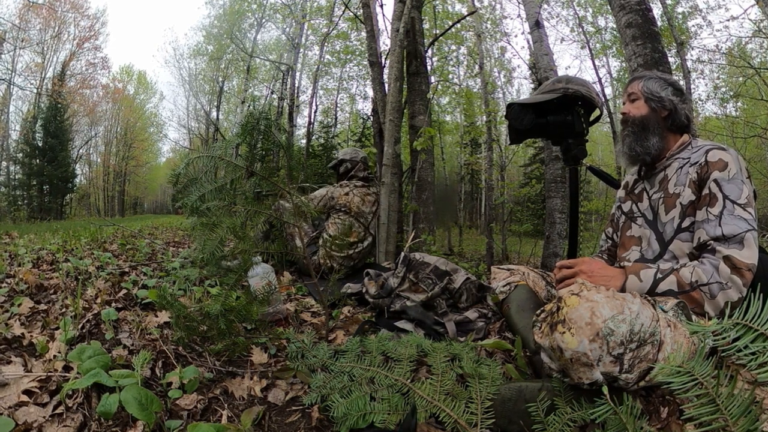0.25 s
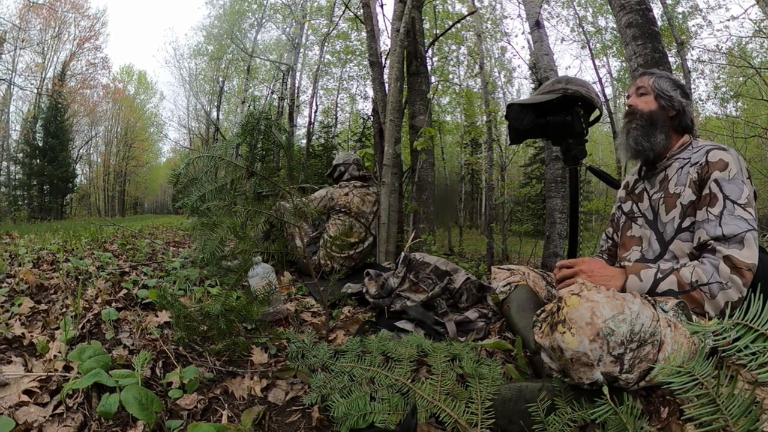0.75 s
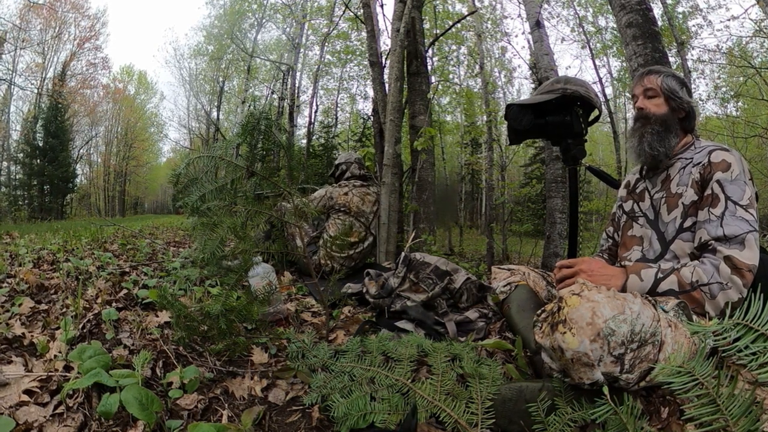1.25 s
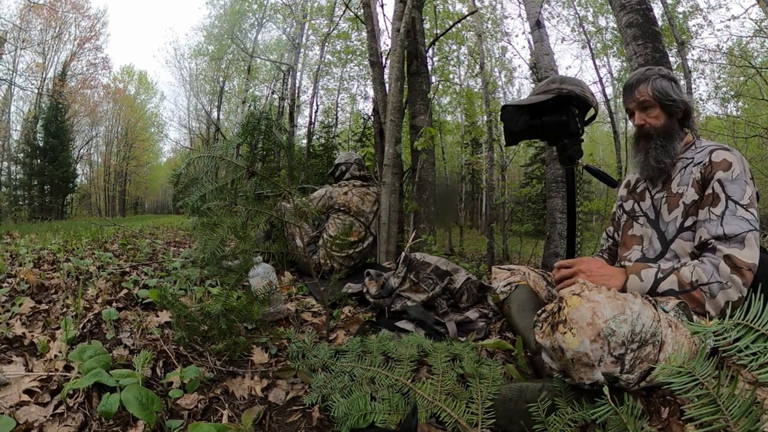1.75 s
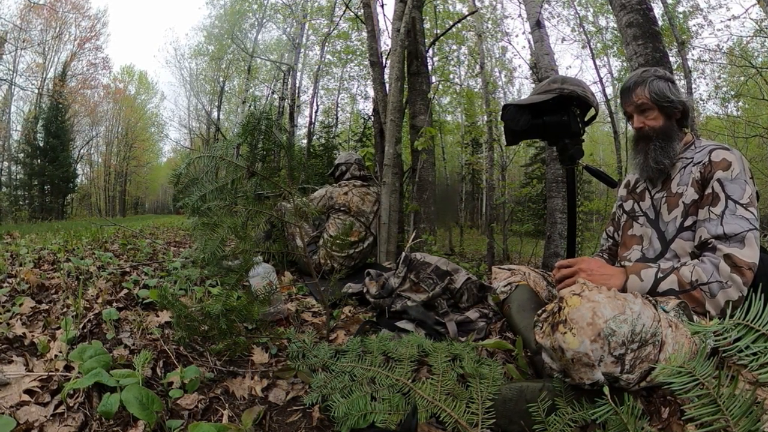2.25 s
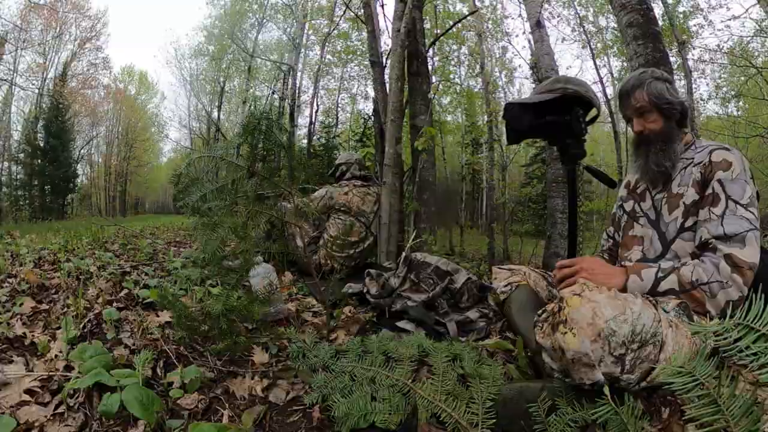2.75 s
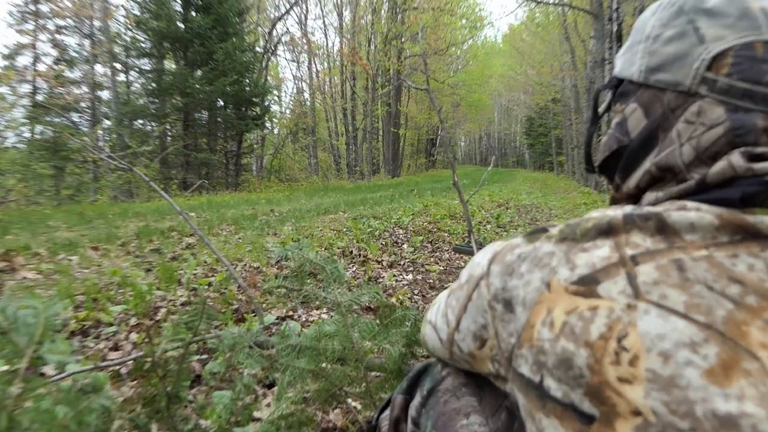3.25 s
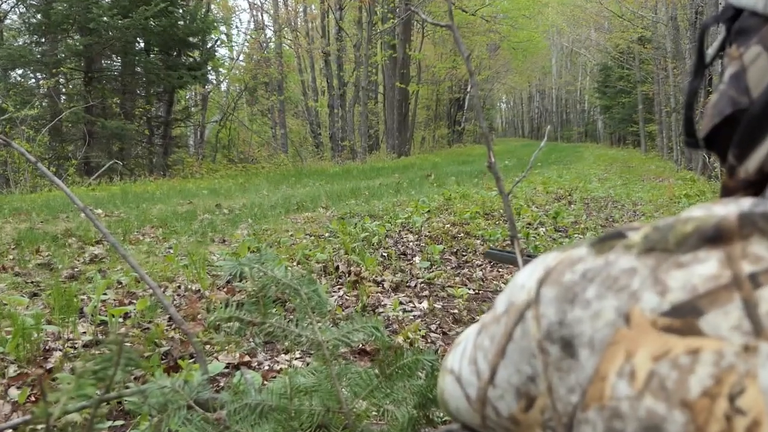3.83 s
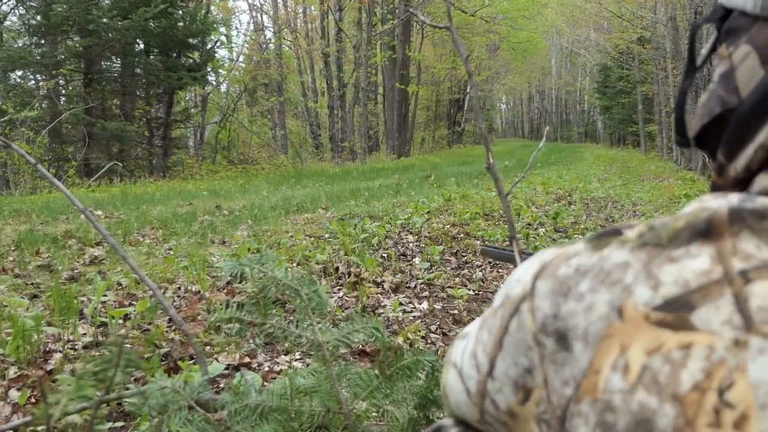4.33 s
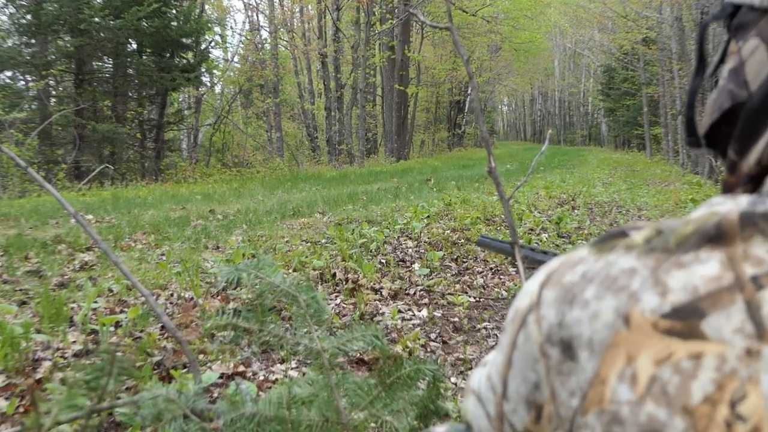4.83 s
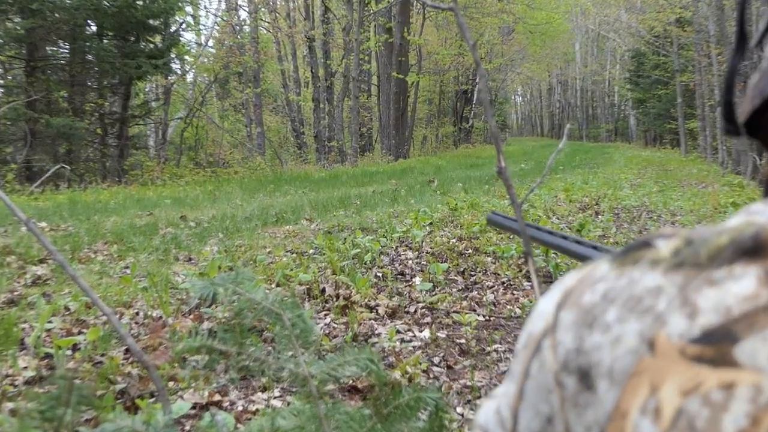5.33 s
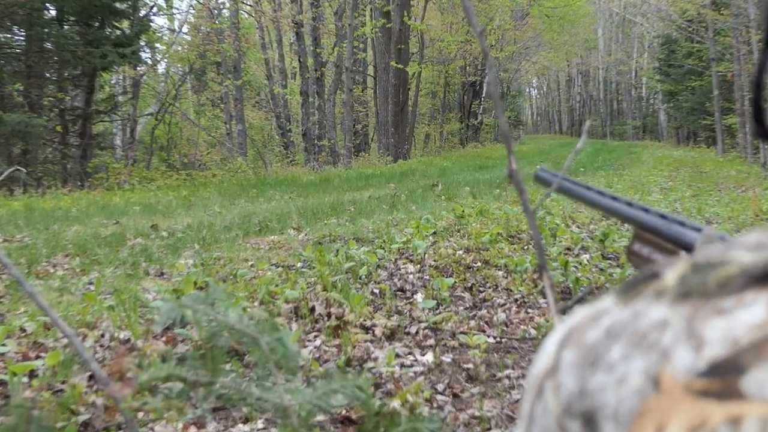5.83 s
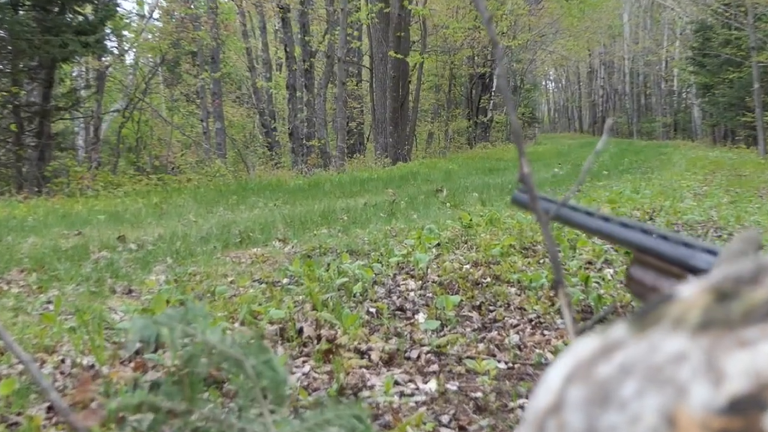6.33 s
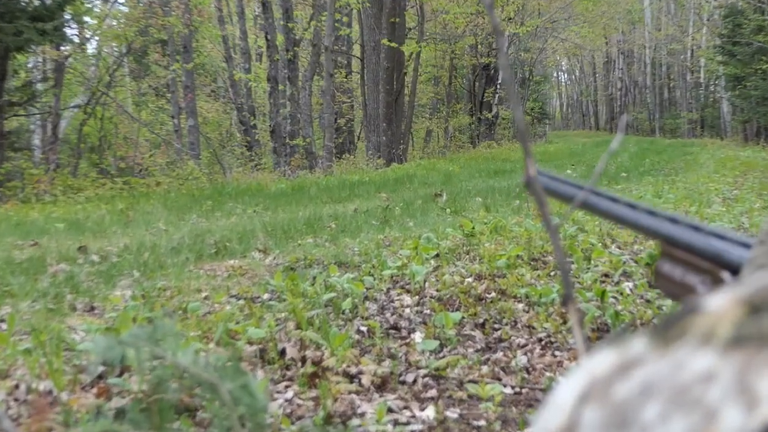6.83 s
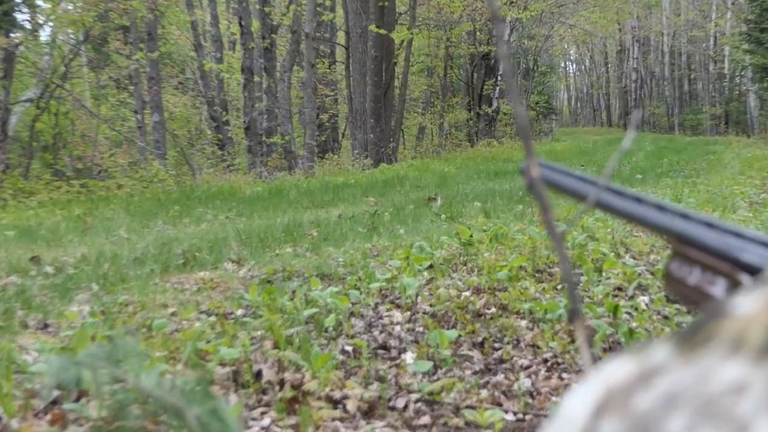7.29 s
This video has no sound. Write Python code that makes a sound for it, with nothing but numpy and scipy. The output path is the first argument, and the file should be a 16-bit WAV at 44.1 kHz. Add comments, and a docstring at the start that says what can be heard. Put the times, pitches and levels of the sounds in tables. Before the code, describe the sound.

Drops tick and patter on leaves over soft, dull outdoor noise. A high warbler zigzags between falling and rising notes, echoing among trunks, while a crow caws harshly, then briefly. At three seconds the sound cuts to a brighter, wider microphone: a small motor whirrs and stops, low rumble passes, dry leaves rustle, a distant thrush whistles, and loud snaps crack close by near the end.

```python
"""A damp spring wood, heard first through a dull microphone and then through a brighter one.
At first drops tick on the leaves as short bursts of noise, over a soft background of coloured noise.
A warbler sings falling and rising sine notes that echo among the trunks; a crow caws as pulses ring its throat.
On the brighter microphone a rumble of noise comes and goes and a small motor whirrs, hums and whines.
Later someone shifts on dry leaves, a crackle of noise, and a far thrush whistles in gliding sines."""
import sys
import numpy as np
from scipy import signal
from scipy.io import wavfile
from scipy.ndimage import uniform_filter1d

SR = 44100
rng = np.random.default_rng(int(sys.argv[2]) if len(sys.argv) > 2 else 0)


def store_pcm(level_fs):
    """Save levels as 16-bit WAV."""
    pcm = np.round(np.clip(level_fs, -1, 1) * 32767).astype(np.int16)
    wavfile.write(sys.argv[1], SR, np.atleast_2d(pcm).T)


N = 333396
T = np.arange(N) / SR  # time of every sample in seconds

# Loudness shape of a plain whistle: place of the peak (0-1), swell before it in dB, fade after it in dB.
WHISTLED = (.15, 8, 9)


def undb(db):
    """Turn decibels into a plain multiplier."""
    return 10 ** (np.asarray(db) / 20)


def level(x, db):
    """Scale a sound so that its average (RMS) level is db."""
    return x * undb(db) / np.sqrt(np.mean(x ** 2))


def smooth_noise(size):
    """Slowly wandering noise: a running average over size samples, scaled to a spread of 1."""
    wander = uniform_filter1d(rng.standard_normal(N), size=size)
    return wander / wander.std()


def arch(start, length):
    """Rise from 0 to 1 and back over the span."""
    return np.sin(np.pi * np.clip((T - start) / length, 0, 1))


def span(start, end, fade):
    """A gate that is open from start to end, with straight fades; all in seconds."""
    return np.clip(np.minimum(T - start, end - T) / fade, 0, 1)


def band(x, lo_hz, hi_hz, order=2):
    """Keep only the pitches between two limits."""
    return signal.sosfilt(signal.butter(order, [lo_hz, hi_hz], "band", fs=SR, output="sos"), x)


def ring(x, modes):
    """Add up resonances, each a narrow band given by its Hz, width in Hz and gain in dB."""
    return sum(undb(db) * band(x, hz - width / 2, hz + width / 2, order=1) for hz, width, db in modes)


def hiss(points, db, flicker_db=0., swell_db=0.):
    """Coloured noise whose bands flicker on their own and swell together."""
    hz, t, z = signal.stft(rng.standard_normal(N), SR, nperseg=2048)
    p = np.array(points)
    colour = np.interp(np.log(hz + 1), np.log(p[:, 0]), p[:, 1])[:, None]
    field = uniform_filter1d(rng.standard_normal(z.shape), size=60, axis=0)  # alike in nearby pitches
    field = uniform_filter1d(field, size=3, axis=1)  # and in nearby moments
    swell = uniform_filter1d(rng.standard_normal(len(t)), size=20)
    gain_db = colour + flicker_db * field / field.std() + swell_db * swell / swell.std()
    noise = signal.istft(z * undb(gain_db), SR, nperseg=2048)[1][:N]
    return level(noise, db)


def trunks(x, t60, wet_db, edge_db=-40, edge_s=0.076):
    """Direct sound, a crowd of echoes dying by 60 dB in t60 seconds, and a late one from the clearing's far edge."""
    t = T[:SR]
    shape = np.exp(-np.log(1000) * t / t60) * np.clip(t / 0.0023, 0, 1)
    shape = shape + undb(edge_db) * np.exp(-((t - edge_s) / 0.0018) ** 2)
    tail = rng.standard_normal(len(t)) * shape
    tail = tail / np.sqrt(np.sum(tail ** 2))
    return x + undb(wet_db) * signal.fftconvolve(x, tail)[:N]


def glide(note, shape):
    """Rows (s, Hz, dB) of one note: its pitch bends from first to last, its loudness swells and fades."""
    start, length, first_hz, last_hz, peak_db, bend = note
    place, swell_db, fade_db = shape
    u = np.linspace(0, 1, 24)  # how far through the note
    place = np.clip(place, .05, .95)
    hz = first_hz + (last_hz - first_hz) * (1 - np.exp(-bend * u)) / (1 - np.exp(-bend))
    swell = swell_db * (1 - u / place) ** 3
    fade = fade_db * ((u - place) / (1 - place)) ** 2
    db = peak_db - np.where(u < place, swell, fade)
    return np.transpose([start + u * length, hz, db])


def curve(rows, fade=0.0028):
    """Columns of a table at every sample, then a gate that is open while it lasts."""
    s, *columns = np.transpose(rows)
    return [np.interp(T, s, c) for c in columns] + [span(s[0], s[-1], fade)]


def whistle(notes, waver):
    """Near sines, one for each note, the pitch unsteady by the share waver."""
    shake = smooth_noise(200)
    out = 0
    for note in notes:
        hz, db, gate = curve(note)
        turn = 2 * np.pi * np.cumsum(hz * (1 + waver * shake)) / SR
        out = out + np.sqrt(2) * undb(db) * gate * np.sin(turn)
    return out


def dull_air():
    """Background of the dull microphone: coloured noise, weak in the highest treble."""
    # Colour of the noise. Each row: pitch in Hz, relative strength in dB per Hz.
    colour = [(8.8, -39), (15, 5.5), (48, 4.5), (102, -4), (191, 0), (536, -21.5), (872, -22),
              (1270, -14.5), (4210, -18.5), (5140, -13), (6850, -11), (10800, -39), (12100, -48),
              (14000, -90)]
    return hiss(colour, -37.5, 1.0, 0.15)


def tick(peak_db, hz, t60, ring_db=5):
    """A drop hits: a sharp crack and a short dying burst of noise that rings near one pitch."""
    t = T[:1500]
    burst = rng.standard_normal(len(t)) * np.exp(-np.log(1000) * t / max(t60, .002))
    burst[:2] += 5, -3  # the crack
    body = band(burst, max(hz / 3, 1000), 7000)
    sound = body + undb(ring_db) * band(burst, hz / 1.164, hz * 1.08, order=1)
    return sound * undb(peak_db) / np.abs(sound).max()


def drops():
    """Loud drops and snapping leaves, each a ringing tick at a set moment."""
    # Each row: start in seconds, peak in dB before echo and microphone, ring in Hz.
    hits = [(0.056, -19.5, 6470), (0.1168, -16, 5140), (0.326, -12, 6100), (0.366, -25, 4500),
            (0.4781, -16, 5960), (0.5053, -18, 3500), (0.5712, -19, 6900), (0.673, -19, 3000),
            (0.705, -18.5, 6310), (0.821, -18, 6900), (0.885, -17, 1160), (1.1422, -11, 2840),
            (1.484, -20, 3420), (1.554, -16, 6000), (1.5787, -20, 2510), (1.9121, -13, 7800),
            (2.017, -27, 2400), (2.7458, -5.5, 5660), (3.149, -17.5, 5610), (3.3086, -6.5, 4900),
            (3.561, -16.5, 6000), (3.6516, -15, 3200), (3.7589, -13.5, 2220), (3.852, -16, 3180),
            (3.9203, -22, 5170), (4.1272, -23.5, 7050), (4.203, -21.5, 8100), (4.2775, -20.5, 4500),
            (4.468, -20, 1660), (4.658, -19, 1300), (4.7276, -20, 2370), (4.771, -21, 2570),
            (4.814, -20, 6200), (5.257, -14.5, 1640), (5.3537, -18.5, 3460), (5.639, -23, 5460),
            (5.9294, -16.5, 4160), (6.3084, -19.5, 2600), (6.4285, -16, 1180), (6.66, -17.5, 4770),
            (7.109, -14.5, 3120), (7.1335, -15, 1620), (7.1562, -14, 6550), (7.229, -23, 3000),
            (7.2913, -3.5, 4440), (7.3134, -7, 3270), (7.3178, -15, 4360), (7.3237, -8.5, 4360),
            (7.3331, -16, 3240), (7.353, -13, 3140), (7.533, -21, 3020)]
    out = np.zeros(N + 1500)
    for s, peak_db, hz in hits:
        i = int(s * SR)
        out[i:i + 1500] += tick(peak_db, hz, .008)
    return out[:N]


def patter(count, db, spread_db, t60, lo_hz=1000, hi_hz=8000):
    """Many small drops at chance moments, each a tick with its own pitch and size."""
    out = np.zeros(N + 1500)
    for at, pitch, size in rng.random((count, 3)):
        i = int(at * N)
        peak_db = db - spread_db * np.log(1 - .97 * size)  # a few are much louder
        out[i:i + 1500] += tick(peak_db, lo_hz * (hi_hz / lo_hz) ** pitch, t60)
    return out[:N]


def warbler():
    """Gliding sines: falling notes swell late and are thin at the top, rising notes start strong and fade."""
    # Notes, falling and rising in turn. Each row: start in seconds, length in seconds, first pitch in Hz,
    # last pitch in Hz, relative peak in dB, bend (above 0 glides quickly at first, below 0 quickly at last).
    song_notes = [(1.708, .055, 7910, 6900, -32.5, 1.2), (1.802, .06, 7220, 8650, -38, .4),
                  (1.92, .076, 8340, 6920, -21, 1.6), (2.035, .06, 7330, 8650, -31, .6),
                  (2.144, .101, 8300, 6740, -21, 1.7), (2.275, .055, 7240, 8540, -23, .5),
                  (2.378, .112, 8450, 6900, -16, 3.2), (2.508, .052, 7330, 8700, -20, -2.2),
                  (2.598, .132, 8870, 6740, -14.5, 2.6), (2.752, .055, 7250, 7990, -20, 2.5),
                  (2.839, .116, 8630, 6790, -15, 2.2)]
    # Loudness shapes: place of the peak (0-1), swell before it in dB, fade after it in dB.
    falling_shape = (0.89, 13, 12)
    rising_shape = (0.25, 7.8, 21)
    thin_hz, thin_db = 7780, 9  # falling notes are weaker by this much above this pitch
    near_s, near_db = .006, -3  # echo off a close trunk, which beats with the gliding note
    notes = np.array([glide(note, rising_shape if note[3] > note[2] else falling_shape) for note in song_notes])
    hz = notes[:, :, 1]
    falling = hz[:, :1] > hz[:, -1:]
    notes[:, :, 2] -= falling * thin_db * np.clip((hz - thin_hz) / 150, 0, 1)
    song = whistle(notes, 0.0034)
    return song + undb(near_db) * np.roll(song, int(near_s * SR))


def crow():
    """Uneven pulses and puffs of air ring the throat; when harsh, every second pulse is weak and the beak rings too."""
    # Each row: start in seconds, length in seconds, pitch in Hz, share by which it sinks, level in dB
    # before its shape and echo, harshness (0-1), strength of the chest resonance in dB.
    caws = [(2.135, .48, 636, .22, -30, 0.8, -2.5), (2.815, .2, 630, .2, -37, 0.8, -20)]
    # Resonances of the throat, and of the beak, which the harsh part rings. Each row: Hz, width in Hz, dB.
    throat = [(1500, 300, 3), (1800, 250, -1)]
    beak_modes = [(2250, 300, -11), (2950, 180, -5), (3430, 330, 3.5)]
    jitter, scatter_db, breath_db = .026, 2.8, -6.5  # unsteady pitch (share), uneven pulses, air
    scoop, scoop_s = 0.34, .017  # pitch starts low by this share and catches up
    attack, attack_db, fade_db = 0.2, 11.5, 6  # attack as a share of the length
    harsh_after_s, harsh_in_s = 0.038, 0.084
    closing = 0.944  # the beak resonances sink to this share as the caw ends
    surge_db = 3  # the lower throat resonance swells towards the end
    closed_modes = [(hz * closing, width, gain_db) for hz, width, gain_db in beak_modes]
    out = 0
    for start, length, pitch_hz, sag, level_db, harshness, chest_db in caws:
        t = np.clip(T - start, 0, length)
        u = t / length
        hz = pitch_hz * (1 - scoop * np.exp(-t / scoop_s) - sag * u ** 1.3)
        db = level_db - attack_db * np.clip(1 - u / attack, 0, 1) - fade_db * u
        gate = np.clip(np.minimum(t, length - t) / 0.06, 0, 1)
        harsh = np.clip(harshness, 0, 1) * np.clip((t - harsh_after_s) / harsh_in_s, 0, 1)
        phase = np.cumsum(hz * (1 + jitter * smooth_noise(120))) / SR
        cycle = phase.astype(int)
        within = phase - cycle
        size = undb(scatter_db * rng.standard_normal(N // 40))[cycle] * (1 - harsh * (cycle % 2))
        pulses = level(size * np.exp(-within / 0.097), 0)
        air = level(np.exp(-within / 0.87) * rng.standard_normal(N), breath_db)
        hoarse = pulses + undb(13) * air
        beak = (1 - u) * ring(hoarse, beak_modes) + u * ring(hoarse, closed_modes)
        voice = ring(pulses + air, [*throat, (1240, 230, chest_db)]) + harsh * beak
        voice = voice + undb(surge_db) * u ** 2 * ring(pulses + air, throat[:1])
        voice = band(voice, 1130, 3220, order=4)
        out = out + voice / voice[gate > 0].std() * undb(db) * gate
    return out


def bright_air():
    """Background of the bright microphone: coloured noise that reaches far into the treble."""
    # Colour of the noise. Each row: pitch in Hz, relative strength in dB per Hz.
    colour = [(18, 4), (30, -1), (64, -7.5), (144, -3), (292, -25.5), (389, -28), (561, -6), (1290, 0.5),
              (3230, -1), (4540, -3), (5890, -2.5), (6540, -4.5), (15500, -13.5)]
    return band(hiss(colour, -39, 0.98, 1.0), 17, 16000)


def side_hiss():
    """Flickering noise that is opposite in left and right, which makes the background wide."""
    # Colour of the noise. Each row: pitch in Hz, relative strength in dB per Hz.
    colour = [(15, -5), (100, -11), (200, -32), (900, -18), (1300, -35), (6000, -27), (9000, -12.5),
              (16000, -13.5)]
    return hiss(colour, -54.5, 5.4)


def rumble():
    """Three bands of noise in spells; returns the shared part and the part opposite in left and right."""
    # The last spell is a soft thump. Each row: start in seconds, end in seconds, deep level in dB,
    # upper and drone levels in dB before the swell, level in dB of the opposite part, swell in dB.
    spells = [(3.039, 3.9, -62, -45.5, -49, -86, 9.5), (3.992, 4.761, -38, -46, -50, -56.5, 0),
              (7.33, 7.418, -70, -51, -66, -75, 10)]
    limits_hz = [(15.1, 31.4), (77.4, 184), (503, 1060), (20, 135)]
    deep, upper, drone, unlike = (level(band(rng.standard_normal(N), lo, hi, order=3), 0) for lo, hi in limits_hz)
    mid = side = 0
    for start, end, deep_db, upper_db, drone_db, unlike_db, swell_db in spells:
        gate = span(start, end, 0.015)
        swell = undb(-swell_db * (1.5 - arch(start, end - start)))
        swelling = swell * (undb(upper_db) * upper + undb(drone_db) * drone)
        mid = mid + gate * (undb(deep_db) * deep + swelling)
        side = side + gate * undb(unlike_db) * unlike
    return mid, side


def motor():
    """A fluttering hiss in the gear resonances, a hum at once and twice the shaft speed, and thin whines."""
    # Resonances of the gears. Each row: Hz, width in Hz, dB for each of two passes.
    gears = [(1670, 350, -2), (2380, 250, -1), (2850, 250, -1), (3250, 400, -1), (4180, 400, -1.5),
             (5950, 650, 1.5), (7600, 990, -7), (10000, 850, -2)]
    # Thin whines. Each row: start in seconds, length in seconds, first pitch in Hz, last pitch in Hz,
    # peak in dB, bend (above 0 glides quickly at first).
    whines = [(4.0, .7, 1262, 1248, -52, .5), (7.49, .07, 1228, 1190, -46, .5)]
    idle_hz, top_shaft_hz, hum_db = 85.5, 134, -59
    whirr_s, whirr_rise_s, whirr_end_s = 3.08, .45, 3.875  # the whirr builds, holds and stops short
    whirr_db, whirr_swell_db = -37.5, 6  # level once built up, and how much softer it starts
    noise = hiss([(20, 0), (20000, 0)], 0, 1.5)
    whirr = level(ring(ring(noise, gears), gears), whirr_db)
    whirr = whirr * undb(-whirr_swell_db * np.clip(1 - (T - whirr_s) / whirr_rise_s, 0, 1))
    whirr = whirr * span(whirr_s, whirr_end_s, .03)
    speed = arch(3.04, 0.58)  # the shaft runs up and down once: start and length in seconds
    shaft_hz = (idle_hz + (top_shaft_hz - idle_hz) * speed) * (1 + 0.044 * smooth_noise(200))
    turn = 2 * np.pi * np.cumsum(shaft_hz) / SR
    hum = undb(hum_db) * speed * (np.sin(turn) + np.sin(2 * turn))
    hum = hum * np.clip(speed / 0.064, 0, 1)
    return whirr + hum + whistle([glide(note, WHISTLED) for note in whines], 0.0037)


def rustle(grain_db=5.5):
    """Cloth and dry leaves crackle: noise with stronger grains, swelling at each shift."""
    # Each row: loudest moment in seconds, level in dB, lasting in seconds (either side of that moment).
    shifts = [(5.62, -40, 0.18), (6.98, -37.5, 0.033), (7.14, -38.5, 0.06), (7.25, -36, 0.074),
              (7.319, -29.5, 0.015), (7.4, -36.5, 0.037)]
    power = sum(undb(2 * db) * np.exp(-((T - s) / lasting) ** 2) for s, db, lasting in shifts)
    strength = np.minimum(rng.exponential(size=N // 40 + 1), 3)  # one for each grain of 40 samples
    grains = rng.standard_normal(N) * undb(grain_db * np.repeat(strength, 40)[:N])
    return level(band(grains, 1220, 8600), 0) * np.sqrt(power)


def thrush():
    """Far whistles: short gliding sines with a strong echo."""
    # Each row: start in seconds, length in seconds, first pitch in Hz, last pitch in Hz,
    # peak in dB before echo, bend (above 0 glides quickly at first, below 0 quickly at last).
    calls = [(6.702, .037, 3230, 3640, -43, 2), (6.745, .03, 3480, 3630, -44, 1.5),
             (6.747, .085, 2950, 2420, -38, -1.9), (6.84, .07, 3580, 3400, -47, 1.2),
             (6.93, .058, 3340, 3570, -49, .5)]
    return trunks(whistle([glide(note, WHISTLED) for note in calls], 0.007), 0.7, 0, 7, .082)


def scene():
    """Mix what each microphone hears, and switch from the dull one to the bright one."""
    after = np.clip((T - 2.991) / 0.006, 0, 1)  # 0 on the dull microphone, 1 on the bright one
    small = patter(count=450, db=-31, spread_db=3.6, t60=.004) * undb(-1.5 * after)
    ticks = trunks(drops(), .12, -18.0) + small
    birds = undb(-1.3) * trunks(warbler(), .65, -3.5, -5) + trunks(crow(), .5, -2)
    # the dull microphone is mono and hears little of the ticks above 7650 Hz
    dull = band(ticks, 790, 7650, order=5) * undb(1.0) + birds + dull_air()
    low, low_side = rumble()
    bright = ticks + bright_air() + low + motor() + rustle() + thrush()
    mid = (1 - after) * dull + after * bright
    side = after * (side_hiss() + low_side)
    return np.array([mid + side, mid - side])


def record(dry):
    """Cut the top steeply above 15900 Hz."""
    return signal.sosfilt(signal.ellip(10, .2, 80, 15900, fs=SR, output="sos"), dry)


dry = scene()
out = record(dry)
store_pcm(out)
```